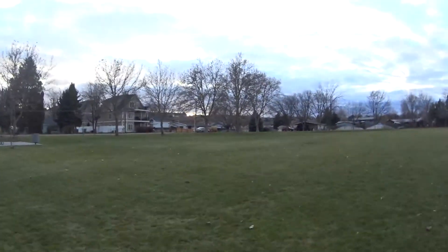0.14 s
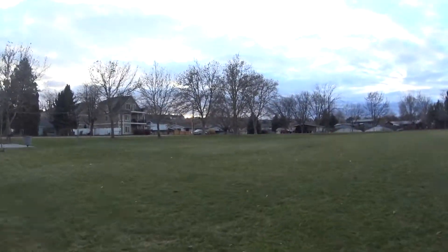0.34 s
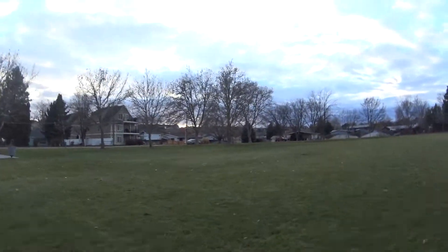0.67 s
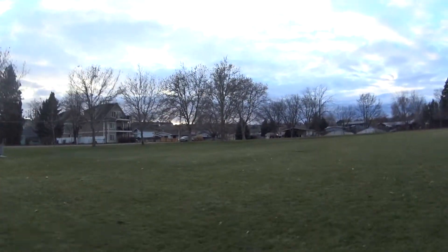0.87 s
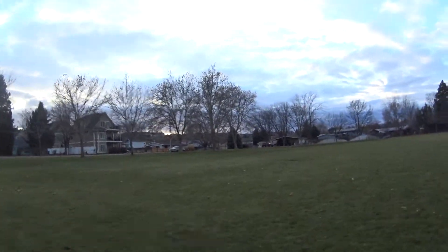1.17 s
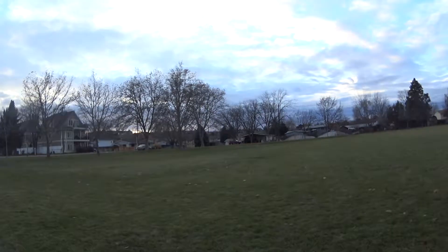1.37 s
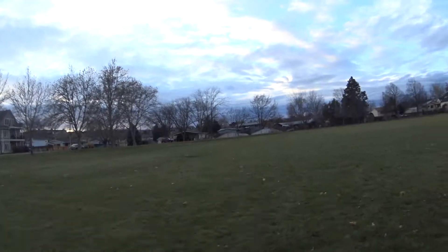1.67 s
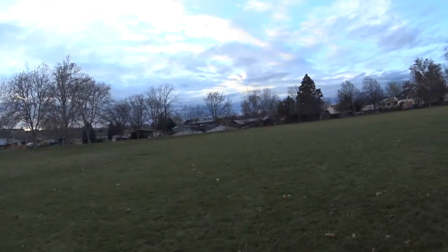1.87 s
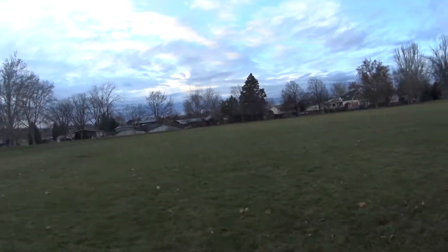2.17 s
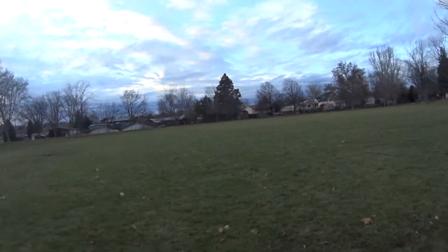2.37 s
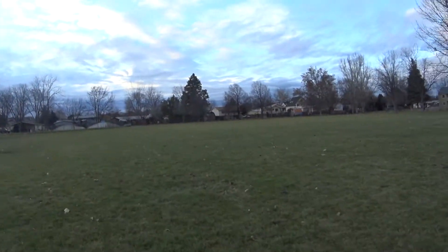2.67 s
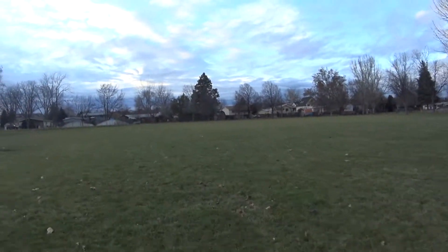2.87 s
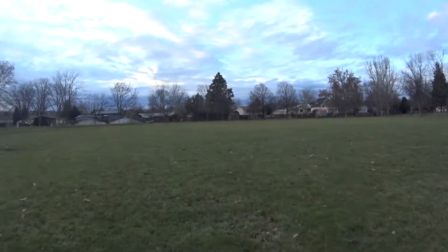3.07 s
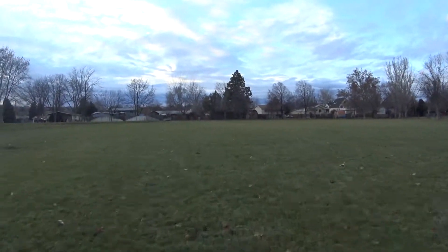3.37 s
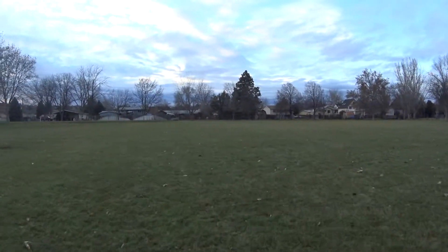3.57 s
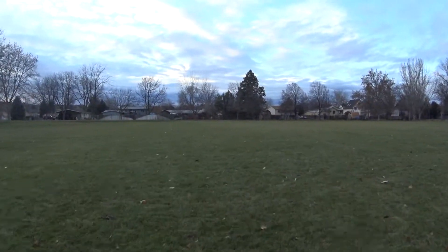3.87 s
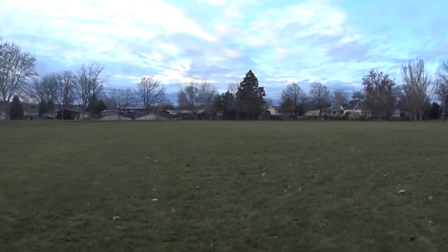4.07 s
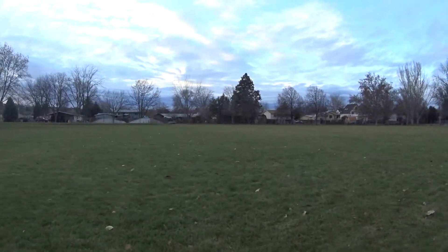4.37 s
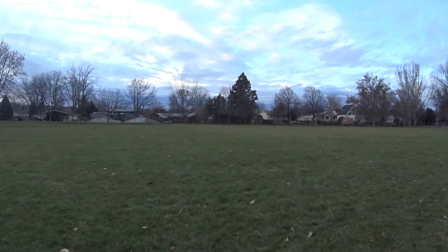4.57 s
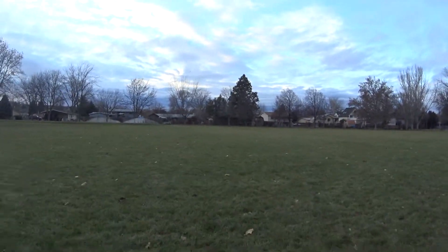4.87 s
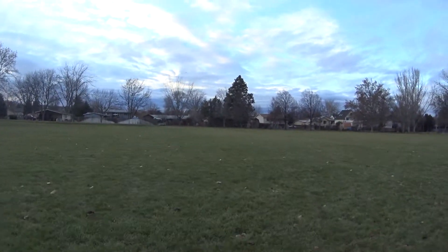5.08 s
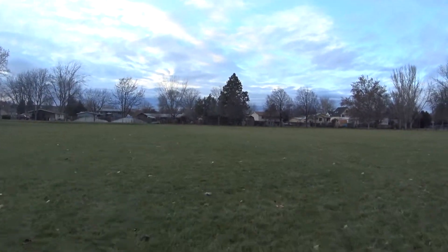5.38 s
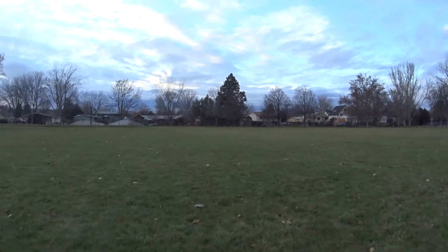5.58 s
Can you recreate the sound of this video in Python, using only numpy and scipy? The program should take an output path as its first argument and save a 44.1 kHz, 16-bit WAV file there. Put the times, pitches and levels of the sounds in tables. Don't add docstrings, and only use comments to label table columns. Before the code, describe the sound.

For almost six seconds, a six-rotor drone flies over an open lawn, heard from a camera bolted to its frame. The sound is full from the first instant: a thick, raspy buzz with blade rates around 130 to 150 Hz and strong harmonics, the rotors slightly out of tune so they beat and waver. Rough mid-range air roar and rapid blade slapping cover it, with a faint, pulsing whistle near 8 kHz. Pitch edges upward from about 1 s, and rotors spread apart most around 2.6 s in a turn, growing rougher. Brief crackles stand out near 0.6, 2.3 and 5.0 s, with small clusters around 2.2 and 4.15 s. Low wind thumps flutter near 1.1 and 2.05 s, easing around 3.5 s. Pitch sags from 3 to 3.6 s, lifts near 4.2 s, dips, and climbs again at the end. Dry, close, evenly loud, gently saturated stereo, cut off without fading.

```python
import sys
import numpy as np
from scipy import signal
from scipy.fft import rfft, irfft, next_fast_len
from scipy.io import wavfile
from scipy.ndimage import uniform_filter1d, map_coordinates

SR = 44100
rng = np.random.default_rng(int(sys.argv[2]) if len(sys.argv) > 2 else 0)


def attenuation_scalar(level_db):
    decades = np.asarray(level_db, float) / 20
    return 10 ** decades


def wrap_up_sound(samples):
    columns = np.atleast_2d(samples).T
    tamed = np.clip(columns, -1, 1)
    steps = np.round(tamed * 32767).astype(np.int16)
    wavfile.write(sys.argv[1], SR, steps)


N = 253134


def unit(x):
    return x / np.sqrt(np.mean(x ** 2) + 1e-20)


def along(points, hz):
    f, v = np.transpose(points)
    return np.interp(np.log(hz + 1), np.log(f + 1), v)


def curves(rows):
    s, *columns = np.transpose(rows)
    return np.array([np.interp(np.arange(N) / SR, s, column) for column in columns])


def wobble(rate):
    knots = rng.standard_normal(int(N / SR * 100) + 4)
    coarse = np.arange(0, N + 32, 32)
    smooth = map_coordinates(knots, [coarse * min(rate, 99) / SR])
    return np.interp(np.arange(N), coarse, smooth)


def filtered(x, response):
    m = next_fast_len(N + 8192)
    hz = np.fft.rfftfreq(m, 1 / SR)
    return irfft(rfft(x, m) * response(hz), m)[..., :N]


def causal(db):
    cepstrum = irfft(np.log(attenuation_scalar(db) + 1e-6))
    half = len(cepstrum) // 2
    cepstrum[1:half] *= 2
    cepstrum[half + 1:] = 0
    return np.exp(rfft(cepstrum))


# (time [s], throttle [Hz of blade rate], turn [Hz], roll [Hz], pitch [Hz])
STICKS = [(0.0, 134.1, -0.46, 2, 0.73), (0.57, 135.7, -2.5, 1.26, -0.56), (0.72, 135.2, -5.5, 1.07, 1.33),
          (1.0, 136.3, -4, -2, -3), (1.29, 143, 1.1, -2, -2.5), (1.87, 145.9, 0.73, -3.5, 0.44),
          (2.01, 145.3, 4.5, 0.61, 1.27), (2.58, 147.7, 13.5, 0.95, 0.42), (2.73, 148.0, 9, -2.5, -0.52),
          (3.01, 142.3, 1.5, 0.17, 0.4), (3.3, 139.8, -4, -0.74, 1.68), (3.59, 139.6, -1.17, 0.62, 0.5),
          (4.16, 143.4, -1.85, -1.41, 1.45), (4.45, 142.3, -5, -1.3, 1.6), (4.88, 140.8, -3.5, -0.0, 1.5),
          (5.17, 145.1, -1.9, 2.0, -1.5), (5.6, 145.8, 1.8, 3.5, -2.5), (5.74, 146.3, -1.4, 0.5, -2.5)]
# (trim [Hz], share of turn [1], of roll [1], of pitch [1])
MIXER = [(-10.5, -0.9, -0.27, -0.09), (5.5, 1.0, 0.23, 0.03), (-1.7, -0.14, -0.66, -0.23),
         (2.7, 0.43, -0.09, -0.66), (1.0, 0.12, -0.2, 1.0), (0.3, -0.5, 1.0, -0.05)]


def speeds():
    throttle, *steer = curves(STICKS)
    mix = np.array(MIXER)
    commanded = throttle + mix[:, :1] + mix[:, 1:] @ np.array(steer)
    hunt_hz = 0.8 + 0.09 * np.maximum(steer[0], 0)
    hunt = np.array([wobble(9) for _ in mix])
    return commanded + hunt_hz * hunt


TONES = [
    (-0.5, -5.5, -3, -13, -14, 2.5),
    (-2, -5, -3.5, -6, -10, -11),
    (-18.5, 0.5, -7, -2.5, -11.5, -9.5),
    (-14.5, -1.5, -15, -6.5, -6.5, -8.5),
    (-13.5, -13, 0, -11.5, -7, -15.5),
    (-25, -9.5, -0.5, -9.5, -9.5, -5.5),
]
# (multiple of blade rate [1], level [dB])
UNBALANCE = [(.5, -35), (1.5, -25), (2.5, -22), (3.5, -14), (4.5, -28)]
LOAD_DB = [-38.5, -38, -30.5, -33, -26.5, -29.5]


def hum(turns):
    out = np.zeros(N)
    blur, flutter_db = 0.25, 1.4
    for turn, load_db, tones in zip(turns, LOAD_DB, TONES):
        load_db = load_db + 1.2 * wobble(11)
        luck = [wobble(12), wobble(22), wobble(30)]
        partials = list(enumerate(tones, 1)) + list(UNBALANCE)
        for n, (k, db) in enumerate(partials):
            phase = 2 * np.pi * (k * turn + rng.random()) + blur * k * luck[n % 3]
            flutter = flutter_db * k ** 0.5 * luck[(n + 1) % 3]
            out += attenuation_scalar(load_db + db + 5.5 + flutter) * np.sin(phase)
    return out


# (centre [Hz], width [Hz], lift [dB])
ARMS = [(537.7, 34.4, 6.5), (459, 81, 1)]


def arm_hum(turns):
    return filtered(hum(turns), lambda hz: attenuation_scalar(frame_db(hz, ARMS)))


# (frequency [Hz], level [dB per Hz])
SLAP = [(250, -34), (500, -9.5), (800, 4.5), (1300, 5.5), (2200, -3), (2800, -15), (3700, -20), (5200, -25),
        (7200, -33.5), (9400, -50), (12000, -47.5)]


def slap_colour(pair):
    return spread(filtered(pair[:, :N], lambda hz: causal(along(SLAP, hz) + frame_db(hz))))


def slaps(turns):
    pair = np.zeros((2, N + SR))
    eddy_db, scatter_db, jitter_s = 3, 4, 0.0008
    for turn in turns:
        at = np.flatnonzero(np.diff(np.floor(turn)))
        luck = rng.standard_normal((1200, 3))[:len(at)]
        size = attenuation_scalar(eddy_db * wobble(35)[at] + scatter_db * luck[:, 0])
        at = np.abs(at + np.round(jitter_s * SR * luck[:, 1])).astype(int)
        pair[0, at] += size
        pair[1, at] += size * luck[:, 2]
    return unit(slap_colour(pair))


# (time [s], peak [dB], blades in a row [count])
CRACKS = [(0.0782, -24, 1), (0.0932, -24, 1), (0.2084, -26, 1), (0.6255, -22, 1), (0.633, -20, 3),
          (1.0574, -24, 1), (1.732, -25, 1), (1.8804, -25, 1), (2.1166, -24, 1), (2.1645, -25, 2),
          (2.1854, -25, 1), (2.1984, -25, 1), (2.3251, -20, 3), (2.4514, -25, 1), (2.5306, -23, 1),
          (2.5424, -24, 1), (2.6674, -23, 1), (3.8254, -24, 1), (4.135, -23, 1), (4.1464, -24, 2),
          (4.1654, -25, 1), (4.2714, -25, 1), (4.3684, -24, 1), (4.8135, -25, 1), (4.8414, -24, 1),
          (4.8554, -25, 1), (5.011, -22, 1), (5.0315, -21, 2), (5.3966, -22, 1)]


def cuts():
    out = np.zeros(N)
    next_blade_s, fade_db = 0.0069, 3
    for s, db, blades in CRACKS:
        k = np.arange(blades)
        at = np.round((s + k * next_blade_s) * SR).astype(int)
        out[at] = attenuation_scalar(db - fade_db * k)
    return out


# (frequency [Hz], level [dB])
CRACK = [(400, -5), (1200, 19), (2300, 21), (3000, 15), (5000, 11), (6500, 5), (9000, -3), (12000, -8)]


def bursts(blows):
    pair = np.roll(blows, 26) * attenuation_scalar(2.5) * [[1], [0.3]]
    return spread(filtered(pair, lambda hz: causal(along(CRACK, hz) + frame_db(hz))))


# (frequency [Hz], level [dB per Hz])
WASH = [(15, -60.5), (60, -36.5), (110, -22.5), (220, -20), (350, -13), (630, -6.5), (1000, -4.5),
        (1600, -12.5), (2250, -17), (2750, -28), (3700, -33.5), (5600, -36), (7400, -34.5), (8900, -40.5),
        (11000, -52.5)]


def wash(turns):
    chop_db, patchy_db = 0.5, 1.5
    z = signal.stft(rng.standard_normal((2, N + 512)), nperseg=512)[2]
    field = rng.standard_normal(z.shape[1:])
    field = uniform_filter1d(uniform_filter1d(field, size=8, axis=0), size=6, axis=1)
    pair = signal.istft(z * attenuation_scalar(patchy_db * unit(field)), nperseg=512)[1][:, :N]
    chop = attenuation_scalar(chop_db * np.cos(2 * np.pi * turns).sum(0) / 2)
    pair = filtered(pair * chop, lambda hz: attenuation_scalar(along(WASH, hz) + frame_db(hz)))
    return unit(spread(pair))


def air_noise(turns, blows, gust_db):
    roar_db = -19.5 + 1.68 * wobble(3.77)
    swing_db = uniform_filter1d(gust_db - gust_db.mean(), size=round(0.3 * SR))
    swirl_db = 37 + gust_db.mean() + 0.8 * swing_db
    lift = signal.fftconvolve(blows / blows.max(), np.hanning(round(2 * 0.018 * SR)), "same")
    shear_db = -18.5 + 6.5 * np.tanh(lift) / 2 + 1.22 * wobble(45) + 0.27 * wobble(14)
    air = attenuation_scalar(-4) * slaps(turns) + wash(turns)
    low = filtered(air, lambda hz: 1 / (1 + (hz / 420) ** 4))
    high = filtered(air, lambda hz: 1 / (1 + (2300 / (hz + 1)) ** 4))
    middle = air - low - high
    return attenuation_scalar(swirl_db) * low + attenuation_scalar(roar_db) * middle + attenuation_scalar(shear_db) * high


# (switching rate [Hz], left [dB], right [dB], right leads by [rad])
DRIVERS = [(7985.4, -10, 0, .1), (8042.7, -4, 0, -1.7), (7996.4, 0, -13, .8), (8030.5, 0, -3, -.9)]
# (multiple of blade rate [1], level under the whistle [dB])
SIDEBANDS = [(1, -18), (2, -14), (3, -20)]
COIL_DB = [-51, -43.5, -50.5, -49]
# (beat rate [Hz], in step at [s], share [1])
TWINS = [(1.61, .78, .6), (1.1, 2.9, .3), (.5, 1, .05), (.5, 1, .05)]


def whistle(turns):
    out, t = np.zeros((2, N)), np.arange(N) / SR
    for driver, turn, level_db, (rate, s0, share) in zip(DRIVERS, turns[2:], COIL_DB, TWINS):
        hz, left_db, right_db, lead = driver
        twin = np.abs(1 + share * np.exp(2j * np.pi * rate * (t - s0)))
        beat = np.ones(N)
        for k, db in SIDEBANDS:
            depth = 2 * attenuation_scalar(db + 3 * wobble(15))
            beat += depth * np.cos(2 * np.pi * k * turn + 0.6 * k * wobble(25))
        phase = 2 * np.pi * (hz * t + rng.random()) + np.array([[0], [lead]])
        sway_db = 0.8 * wobble(4) + 2 * wobble(30) + 2 * wobble(80)
        envelope = attenuation_scalar(level_db + sway_db) * twin * beat
        out += attenuation_scalar([[left_db], [right_db]]) * envelope * np.sin(phase)
    return out


# (time [s], strength [dB])
GUST = [(0.0, -47), (1.01, -59), (1.07, -43.5), (1.21, -47.5), (1.95, -48.5), (2.05, -37), (2.06, -50),
        (2.67, -47.5), (3.5, -63.5), (3.79, -56), (5.51, -56), (5.74, -44.5)]


def gusts():
    return curves(GUST)[0]


def buffet(gust_db):
    lumps = rng.standard_normal((2, N)) * attenuation_scalar(2.7 * wobble(13))
    low = filtered(lumps, lambda hz: hz / (hz + 25) / (1 + (hz / 95) ** 4))
    return attenuation_scalar(gust_db - 2.5) * spread(low / np.std(low))


# (centre [Hz], width [Hz], lift [dB])
FRAME = [(796, 36, 4), (1249, 370, 5.5), (1934, 160, 5.5), (2182, 215, 6), (2540, 120, 7), (2906, 435, 8.5),
         (3940, 250, 2), (4560, 720, 4), (5010, 210, 2.5), (6660, 410, 2)]


def frame_db(hz, modes=FRAME):
    return sum(db / (1 + (2 * (hz - centre) / width) ** 2) for centre, width, db in modes)


# (frequency [Hz], coherence [1])
ALIKE = [(30, .9), (60, 1), (110, 1), (2100, 1), (2700, .6), (3200, 0.38), (4500, .6), (6000, 0.17),
         (9000, 0.4)]


def spread(pair):
    def shares(hz):
        angle = np.arccos(np.clip(along(ALIKE, hz), 0, 1)) / 2
        return np.array([np.cos(angle), np.sin(angle)])

    mid, side = filtered(pair, shares)
    return np.array([mid + side, mid - side])


# (frequency [Hz], right leads by [rad])
LEAD = [(20, .1), (150, .55), (300, 0.89), (700, 1.7), (1200, 1.56), (2300, 0.95), (2800, 2.87), (3400, 1),
        (4300, .3), (5500, 0.68), (9000, 1.1)]
# (frequency [Hz], left minus right [dB])
TILT = [(30, -0.5), (190, 0.5), (330, -1), (590, -1.5), (1050, -3.5), (1850, -8), (3280, -2.5), (5800, 0.5),
        (10300, 3.5)]


def ports(x):
    def both(hz):
        half = attenuation_scalar(along(TILT, hz) / 2) * np.exp(-0.5j * along(LEAD, hz))
        return np.array([half, 1 / half])

    return filtered(x, both)


def scene():
    turns = np.cumsum(speeds(), axis=1) / SR + rng.random((len(TONES), 1))
    blows, gust_db = cuts(), gusts()
    heard = arm_hum(turns) + bursts(blows) + air_noise(turns, blows, gust_db) + buffet(gust_db)
    return ports(heard) + whistle(turns)


def levelled(x):
    span = round(0.067 * SR)
    power = uniform_filter1d(uniform_filter1d(np.mean(x ** 2, 0), size=span), size=span)
    return x * attenuation_scalar(-13.5) / np.sqrt(np.abs(power) + 1e-9)


# (time [s], peak [dB])
WIDE = [(0.1575, -54), (0.4614, -58), (0.6255, -55), (1.504, -63), (1.7604, -61), (1.8068, -60),
        (1.83, -60), (2.0642, -58), (2.1494, -57), (2.3094, -52), (2.3994, -62), (2.457, -62), (2.643, -62),
        (2.6913, -67), (3.275, -58), (3.5483, -62), (4.0831, -62), (4.1525, -56), (4.245, -63),
        (4.477, -63), (4.756, -62), (5.434, -61)]


def band_limited(x):
    edge_hz, sway_hz = 8880, 200

    def top_band(hz):
        notch = np.abs(hz - 10000) > 200
        return (hz > edge_hz + sway_hz) * notch * attenuation_scalar(-3 * (hz > 9800))

    top = unit(filtered(x.mean(0), top_band))
    opened = np.zeros(N)
    for s, db in WIDE:
        opened[round(s * SR) + 240:][:1024] = attenuation_scalar(db - 8) * np.hanning(1024) ** 0.3
    sure = filtered(x, lambda hz: hz <= edge_hz - sway_hz)
    most = filtered(x, lambda hz: hz <= edge_hz + sway_hz)
    flicker = np.array([wobble(40), wobble(40)]) > -0.2
    kept = uniform_filter1d(1.0 * flicker, size=300)
    return sure + kept * (most - sure) + opened * top


def low_pass(x):
    return signal.sosfilt(signal.butter(12, 10880, fs=SR, output="sos"), x)


def record(dry):
    even = levelled(dry)
    soft = even / (1 + np.abs(even / 0.63) ** 4) ** (1 / 4)
    mix = band_limited(soft)
    return low_pass(mix)


dry = scene()
out = record(dry)
wrap_up_sound(out)
```